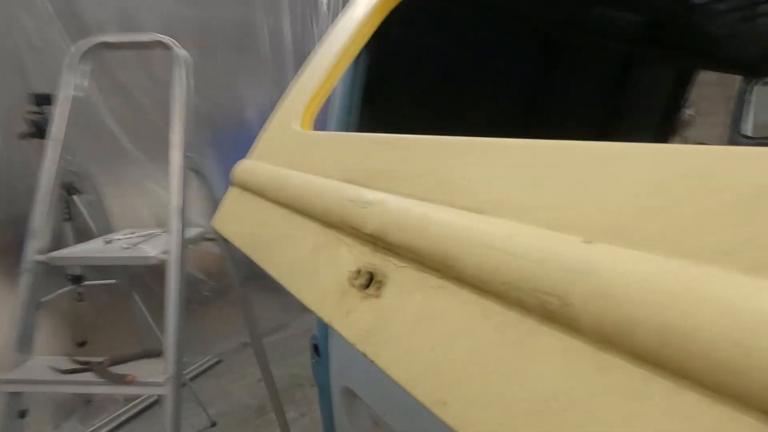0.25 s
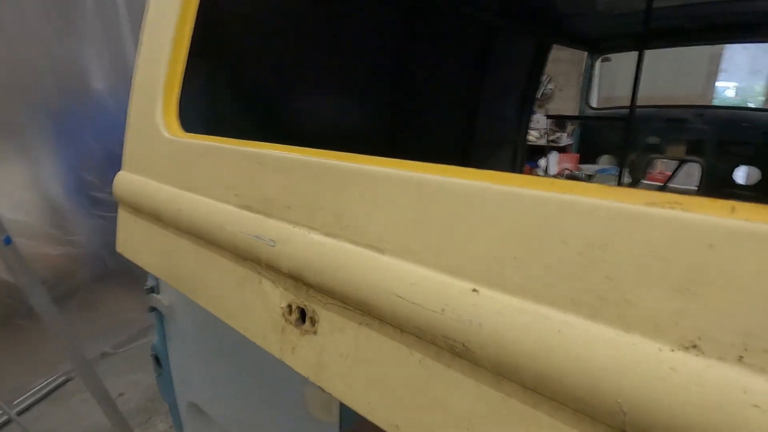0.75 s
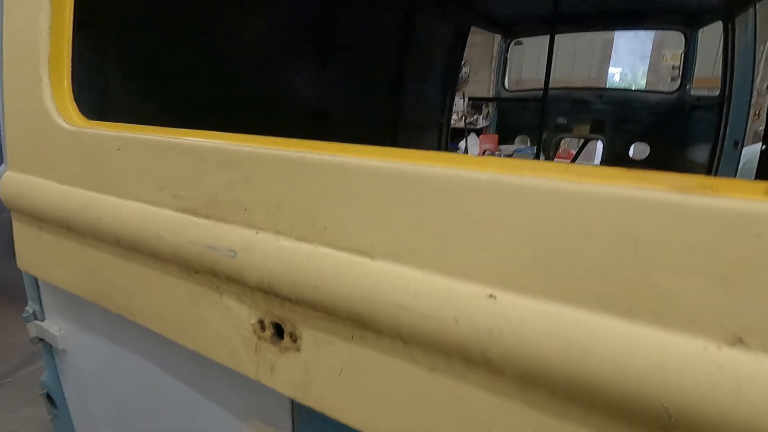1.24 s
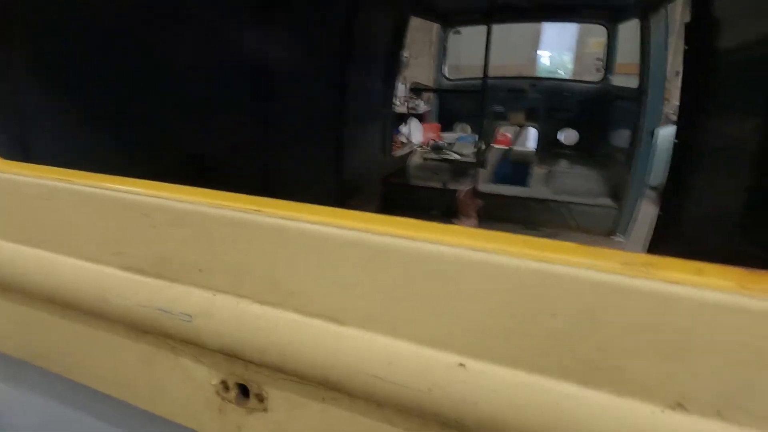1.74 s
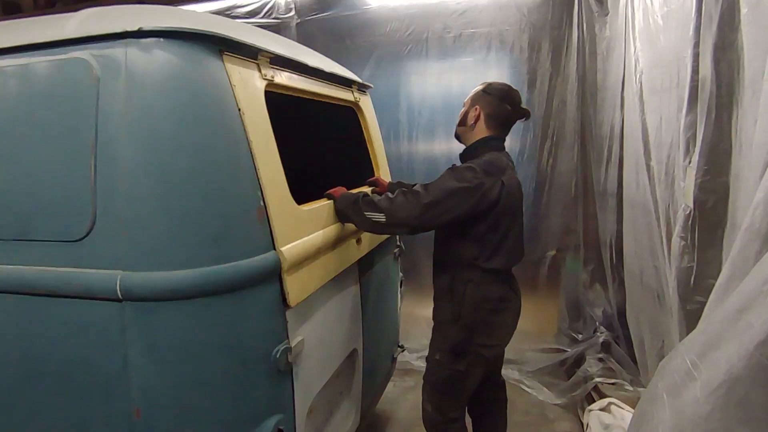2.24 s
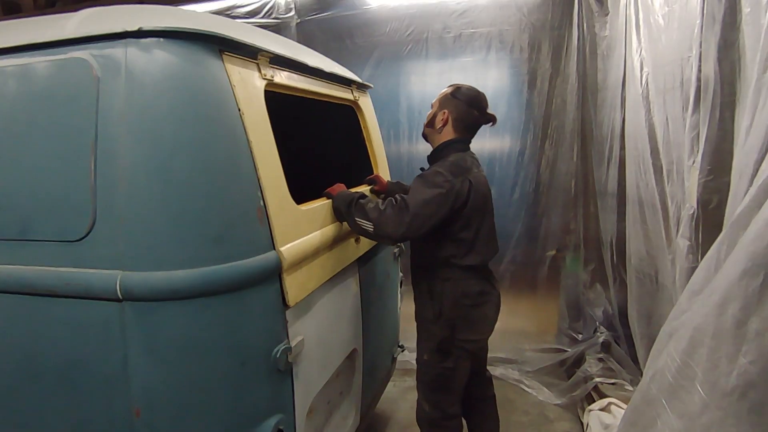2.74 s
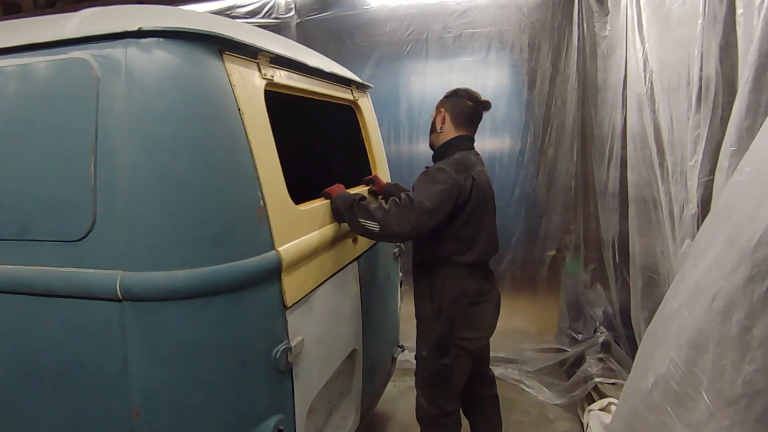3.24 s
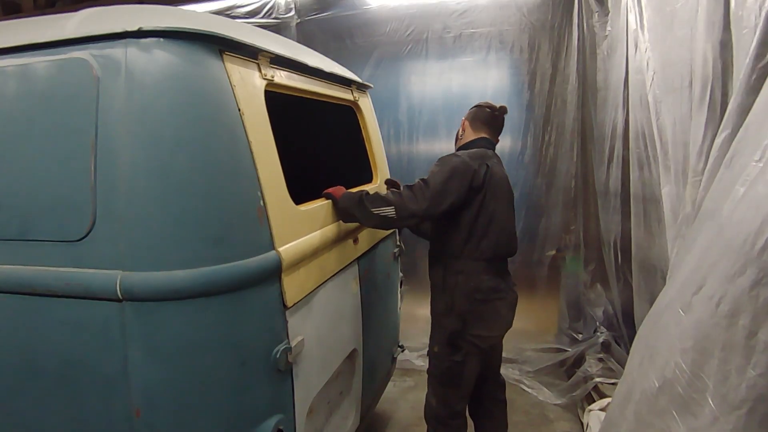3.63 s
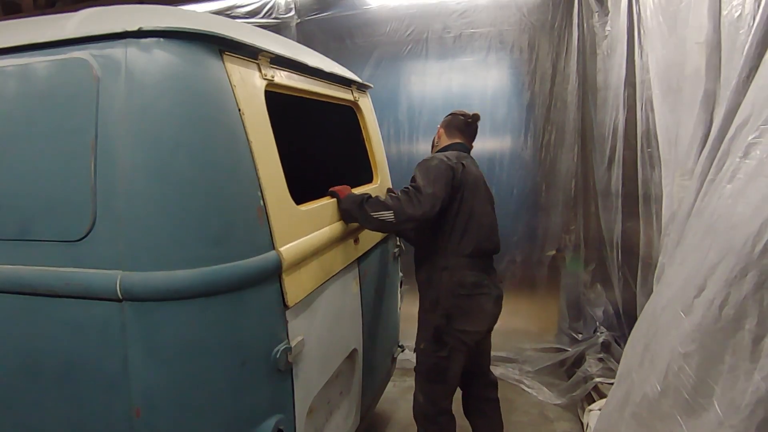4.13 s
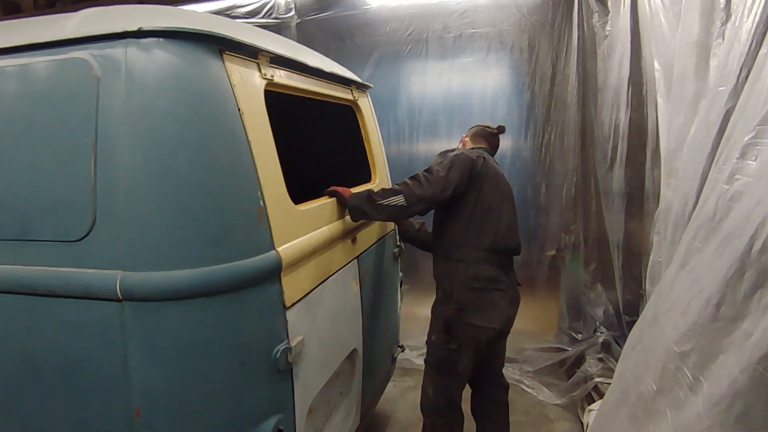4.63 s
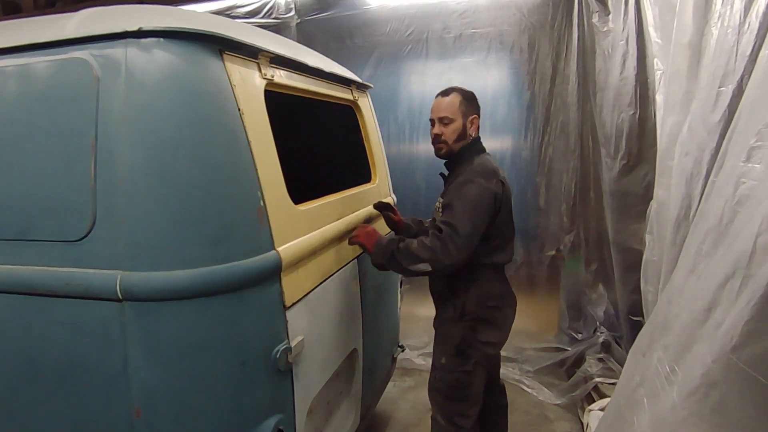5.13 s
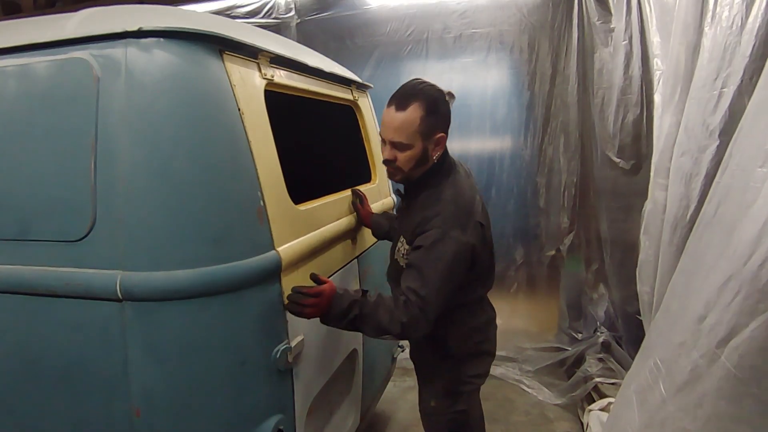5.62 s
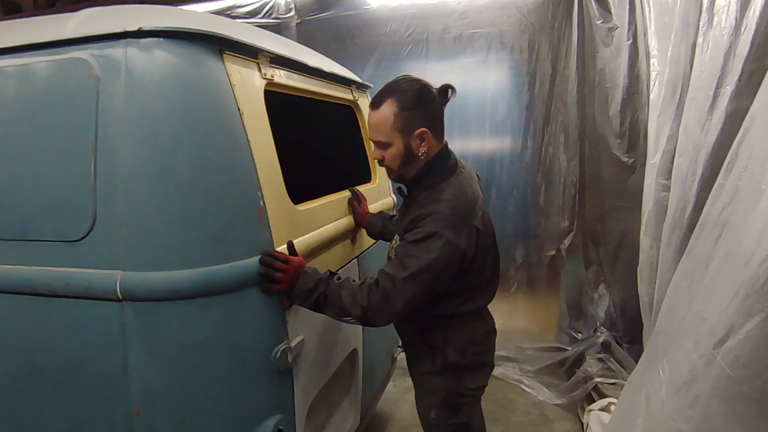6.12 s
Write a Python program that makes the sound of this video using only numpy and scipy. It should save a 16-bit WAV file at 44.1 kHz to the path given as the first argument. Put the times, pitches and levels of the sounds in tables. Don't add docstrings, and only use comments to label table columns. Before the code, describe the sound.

Creaks and clicks of a van tailgate swinging, one close slam with rattling rebounds, then three heavier, farther booming slams in a hushed garage.

```python
import sys
import numpy as np
from scipy import signal
from scipy.fft import rfft, irfft, next_fast_len
from scipy.io import wavfile
from scipy.ndimage import uniform_filter1d, map_coordinates

SR = 44100
rng = np.random.default_rng(int(sys.argv[2]) if len(sys.argv) > 2 else 0)


def generate_wav(signal):
    frames = np.transpose(np.atleast_2d(signal))
    scaled = np.clip(frames, -1, 1) * 32767
    pcm = np.round(scaled).astype(np.int16)
    wavfile.write(sys.argv[1], SR, pcm)


def rack_gain(trim_db):
    fader = np.asarray(trim_db, float)
    return 10 ** (fader / 20)


N = 280942
TIME = np.arange(N) / SR
CUT_S = 2.232

# (t/s, rise/s, clang level/dB, shudder/s, boom over clang/dB)
SLAMS = [
    (3.05, 0.033, -21, 0.44, -5),
    (4.257, 0.043, -14, 0.44, -7),
    (5.867, .011, -15.5, 0.43, -6.5),
]
# (f/Hz, width/Hz, level/dB)
PANEL = [(161, 10, 2.5), (200, 25, -6), (263, 37, -2), (447, 71, -5), (542, 20, -5), (701, 56, -6.5),
         (914, 33, -8.5), (1070, 17, -16.5), (1477, 39, -6.5)]
# (f/Hz, level/dB)
BLOW = [(40, -19), (150, -8.5), (500, -9), (1500, -10.5), (4000, -32), (9000, -41.5), (15000, -56.5)]
CRACK_RISE_S = 0.0015


def unit(x):
    return x / np.sqrt(np.mean(x ** 2) + 1e-20)


def along(points, hz):
    f, v = np.transpose(points)
    return np.interp(np.log(hz + 1), np.log(f + 1), v)


def coloured(x, response):
    size = 2 * next_fast_len(len(x) // 2 + 8192)
    gain = np.abs(response(np.fft.rfftfreq(size, 1 / SR)))
    cepstrum = irfft(np.log(gain + 1e-6), size)
    cepstrum[1:size // 2] *= 2
    cepstrum[size // 2 + 1:] = 0
    return irfft(rfft(x, size) * np.exp(rfft(cepstrum)), size)[:len(x)]


def peaks(modes, hz, sharp, base):
    power = sum(rack_gain(2 * db) / (1 + (2 * sharp * (hz - c) / w) ** 2) for c, w, db in modes)
    return np.sqrt(base ** 2 + power)


def edge(hz, at_hz):
    return 1 / (1 + (at_hz / (hz + 1)) ** 8)


def chatter(rate_hz, spread_db, share):
    chance = rng.random(N)
    size = np.minimum(rng.exponential(1, N), 3)
    bed = rng.standard_normal(N)
    hits = (chance < rate_hz / SR) * rack_gain(spread_db * size)
    return share * unit(hits) + (1 - share) * bed


def wobble(rate_hz):
    return map_coordinates(rng.standard_normal(400), [TIME * np.clip(rate_hz, 1, 60)])


def swell(s, length_s):
    return np.exp(-(2 * (TIME - s) / length_s - 1) ** 4)


def patchy(x, depth_db):
    z = signal.stft(x, nperseg=512)[2]
    field = uniform_filter1d(rng.standard_normal(z.shape), size=5, axis=0)
    field = uniform_filter1d(field, size=6, axis=1)
    return signal.istft(z * rack_gain(depth_db * unit(field)), nperseg=512)[1][:N]


def soft(db):
    return uniform_filter1d(rack_gain(db), size=150)


def ramp(s, length_s):
    return np.clip((TIME - s) / max(length_s, .001), 0, 1)


def fade(s, db_per_s):
    return -abs(db_per_s) * np.maximum(TIME - s, 0)


def slams():
    # (f/Hz, density/dB)
    clangs = [
        [(15, -44), (25, -10), (92, 6.5), (155, -1.5), (231, 1.5), (447, -11), (629, -9), (1060, -13),
         (1150, -12.5), (3000, -45.5), (3900, -61), (6600, -120)],
        [(15, -35), (25, -6), (102, -2.5), (209, -4), (271, 1), (318, -6), (604, -7.5), (816, -11), (1190, -13),
         (3000, -32), (3900, -61.5), (6600, -120)],
        [(15, -49.5), (25, -14), (96, -4.5), (240, -4), (318, -11), (389, -4.5), (569, -6), (816, -6),
         (1100, -8), (3000, -33), (3900, -35), (6600, -120)],
    ]
    # (f/Hz, density/dB)
    sizzles = [
        [(1180, -40.5), (2000, 2.5), (2430, -1), (3030, -10.5), (3740, -6), (4620, -17), (5580, -12),
         (7000, -27), (7630, -26), (9280, -33.5), (13000, -39)],
        [(1180, -25.5), (2000, -3.5), (2280, -6.5), (2820, -2), (3080, -7), (3630, -2), (4410, -13.5),
         (5670, -9.5), (6790, -24.5), (11400, -33), (13000, -41)],
        [(1180, -35.5), (2000, -5.5), (2940, -7.5), (3150, -14), (3740, -10), (4520, -23), (5200, -16.5),
         (6790, -33), (8450, -33), (10100, -40), (13000, -43.5)],
    ]
    # (f/Hz, width/Hz, level/dB)
    latch_rings = [
        (5600, 300, 0.5),
        (5730, 150, -1),
        (4930, 170, 3),
    ]
    # (f/Hz, width/Hz, level/dB)
    body_modes = [(45, 17, 2.5), (88.6, 7.5, 2.5), (103, 21, 2), (138, 42, -3), (183, 14, -0.5),
                  (236.1, 5.1, 2), (289.7, 8.6, 0)]
    # (f/Hz, width/Hz, level/dB)
    skin_modes = [(343, 6.2, 0.5), (380.2, 42, -3.5), (473, 38, -4.5), (486.6, 14, -2.5), (524, 5.9, -7.5),
                  (578, 14, 1), (659.5, 12, 1), (728, 38, -1.5), (867, 18, -5.5), (977, 7.7, -8.5),
                  (1110, 13, -1), (1216, 20, -3), (1328, 23, -2.5), (1420, 7.1, -0.5), (1540, 35, -1.5),
                  (1662, 70, -4), (1740, 62, -3), (2050, 20, -9)]
    latch_levels = [-16.5, -18, -16]
    close_times = [3.445, 4.698, 6.288]
    out = np.zeros(N)
    for row, clang, sizzle, ring, latch_db, close_s in zip(
            SLAMS, clangs, sizzles, latch_rings, latch_levels, close_times):
        boom_gain, skin_gain, latch_gain = shudder(*row, latch_db, close_s)

        def body_response(hz):
            return rack_gain(along(clang, hz)) * peaks(body_modes, hz, 1.0, 0.2) * np.sqrt(edge(hz, 41) - edge(hz, 270))

        def skin_response(hz):
            return rack_gain(along(clang, hz)) * peaks(skin_modes, hz, 0.89, 0.53) * np.sqrt(edge(hz, 300))

        def latch_response(hz):
            return rack_gain(along(sizzle, hz)) * peaks([ring], hz, 0.88, 1)

        shake = chatter(600, 2.3, 0.34)
        body = coloured(shake, body_response)
        skin = coloured(shake, skin_response)
        latch = patchy(coloured(chatter(2300, 2.0, 0.23), latch_response), depth_db=2.0)
        out += boom_gain * unit(body)
        out += skin_gain * rack_gain(0.73 * wobble(35)) * unit(skin)
        out += latch_gain * unit(latch)
    return out


def shudder(s, rise_s, clang_db, length_s, boom_db, latch_db, close_s):
    # (lead-in/dB, fade/(dB/s), sag over shudder/dB, drop as suppressor closes/dB, tail
    # fade/(dB/s))
    answers = [
        (-16, -7.5, 15, -2, 60),
        (-26, 26.5, 18.5, 6.5, 48.5),
        (-31, 38, 20, 11, 34.5),
    ]
    peak_s = s + rise_s
    share = ramp(peak_s, length_s)
    lead = (1 - ramp(s, rise_s)) ** 1.6
    closed = ramp(close_s, 0.014)
    gains = []
    for part_db, (lead_db, early, sag_db, drop_db, late) in zip((boom_db, 0, latch_db), answers):
        db = clang_db + part_db + lead_db * lead
        db = db - early * length_s * share - sag_db * share ** 2
        db = db - drop_db * closed + fade(peak_s + length_s, late)
        gains.append(soft(db - 200 * (TIME < s)))
    return gains


def blows():
    # (t/s, peak/dB)
    strikes = [
        (3.052, -10),
        (3.068, -3),
        (4.26, -15),
        (4.272, -6),
        (4.28, 7.5),
        (4.318, 1),
        (5.862, -18),
        (5.873, 3),
    ]
    # (t/s, f/Hz, level/dB)
    puffs = [
        (1.6595, 270, -19),
        (3.052, 298, -18.5),
        (4.318, 229.8, -11),
        (5.863, 200, -19),
        (5.8737, 444, -3),
    ]
    crack, push, t = np.zeros(N + SR), np.zeros(N + SR), TIME[:SR // 20]
    crack_rise = 1 - np.exp(-t / CRACK_RISE_S)
    push_rise = 1 - np.exp(-t / 0.002)
    for s, db in strikes:
        burst = crack_rise * rack_gain(db + 7 - 60 * t / 0.015) * rng.standard_normal(len(t))
        crack[round(s * SR):][:len(t)] += burst
    for s, hz, db in puffs:
        swing = rack_gain(db + 3.5 - 60 * t / 0.03) * push_rise * np.sin(2 * np.pi * hz * t)
        push[round(s * SR):][:len(t)] += swing
    return coloured(crack[:N], lambda hz: rack_gain(along(BLOW, hz))) + push[:N]


def knocks():
    # (t/s, f/Hz, peak/dB)
    hits = [(1.266, 390, -9.5), (1.279, 203, -6), (1.306, 232, -9.5), (1.32, 192, -11.5), (1.332, 231, -11),
            (1.36, 274, -9), (1.409, 188, -13), (1.422, 253, -13), (1.437, 252, -16.5), (1.453, 258, -13),
            (1.504, 171, -27), (1.515, 183, -22), (3.084, 328, -13), (3.105, 333, -13.5),
            (3.124, 258, -14.5), (3.135, 339, -14.5), (3.158, 199, -16), (3.18, 234, -8),
            (3.203, 150, -15.5), (3.268, 279, -18.5), (3.282, 193, -22), (3.37, 263, -22),
            (3.408, 236, -32), (3.443, 150, -39), (4.293, 336, -5), (4.317, 226, -6.5), (4.355, 409, -8.5),
            (4.386, 215, -9), (4.406, 263, -10.5), (4.449, 249, -12), (4.512, 150, -18),
            (4.522, 260, -14.5), (4.556, 167, -16), (4.571, 258, -24), (4.59, 301, -21),
            (4.603, 306, -21.5), (4.619, 161, -27), (4.634, 150, -21), (4.648, 150, -25),
            (5.883, 1028, -11.5), (5.924, 549, -9.5), (5.943, 211, -9.5), (5.964, 161, -5),
            (5.992, 215, -13.5), (6.044, 272, -12.5), (6.064, 236, -11), (6.11, 602, -22),
            (6.135, 150, -16), (6.153, 226, -18), (6.186, 150, -23), (6.198, 151, -13), (6.24, 150, -20),
            (6.257, 149, -22), (6.317, 223, -41)]
    cycles, level_db, crack_db = 6, 2.5, -16
    out, t = np.zeros(N + SR), TIME[:SR // 20]
    rise = 1 - np.exp(-t / CRACK_RISE_S)
    cracks = coloured(rng.standard_normal(N + SR), lambda hz: rack_gain(along(BLOW, hz)))
    for s, hz, db in hits:
        at = round(s * SR)
        swing = np.sin(2 * np.pi * hz * t) * rack_gain(-60 * t * hz / cycles)
        crack = unit(cracks[at:][:len(t)]) * rack_gain(crack_db - 60 * t / .012)
        out[at:][:len(t)] += rack_gain(db + level_db) * rise * (swing + crack)
    return out[:N]


def rings():
    # (t/s, length/s, f/Hz, level/dB)
    modes = [(0.3, 0.075, 1087, -53), (0.303, 0.11, 699, -50), (0.366, 0.12, 3617, -50),
             (0.374, 0.075, 2379, -47), (0.505, 0.049, 1571, -39), (1.249, 0.11, 2024, -35.5),
             (1.298, 0.089, 872, -28), (1.319, 0.168, 301, -29.5), (1.355, 0.087, 5307, -51.5),
             (1.364, 0.07, 6104, -53.5), (1.398, 0.075, 1528, -33), (1.405, 0.068, 1431, -39.5),
             (1.486, 0.07, 4048, -55), (1.509, 0.051, 872, -46), (1.759, 0.087, 2142, -69),
             (1.846, 0.13, 710, -51.5), (2.038, 0.116, 2734, -62), (2.254, 0.064, 602, -62),
             (2.717, 0.284, 602, -69.5), (2.757, 0.081, 1453, -82.5), (3.061, 0.064, 6395, -67),
             (3.077, 0.087, 1130, -32), (3.112, 0.075, 5738, -68), (3.117, 0.134, 4059, -64),
             (3.187, 0.064, 5394, -55), (3.303, 0.048, 1130, -51), (3.32, 0.081, 5598, -81),
             (3.338, 0.058, 3962, -80), (3.542, 0.064, 1754, -70), (3.855, 0.07, 1108, -74),
             (3.987, 0.0516, 613, -70), (4.273, 0.052, 6212, -58.5), (4.272, 0.064, 2756, -49),
             (4.277, 0.058, 5437, -47.5), (4.326, 0.168, 4618, -67.5), (4.398, 0.075, 5781, -57.5),
             (4.412, 0.058, 5544, -57), (4.418, 0.041, 6223, -67.5), (4.464, 0.059, 1162, -34),
             (4.485, 0.069, 3456, -57), (4.534, 0.058, 4651, -74), (5.87, 0.07, 2982, -46),
             (5.864, 0.07, 3692, -48), (5.871, 0.07, 4026, -53), (5.869, 0.064, 3197, -42),
             (5.869, 0.07, 5286, -48), (5.962, 0.064, 2971, -49), (5.973, 0.07, 1108, -29),
             (6.089, 0.069, 2939, -56), (6.089, 0.07, 3391, -62)]
    level_db, drift_rad = 3.5, 0.35
    out, drift = np.zeros(N), drift_rad * wobble(40)
    for s, length_s, hz, db in modes:
        span = slice(round(s * SR), round((s + length_s) * SR))
        t = TIME[span] - s
        tone = np.sin(2 * np.pi * hz * t + drift[span])
        out[span] += rack_gain(db + level_db) * np.sin(np.pi * t / length_s) * tone
    return out


def contacts():
    # (t/s, peak/dB, knock/dB, tick/dB, t60/s)
    touches = [(0.0294, -27.5, -8, -28, 0.28), (0.167, -38, 4, -29, 0.14), (0.2746, -39.5, -2, -31, 0.63),
               (0.3922, -15.5, -29, -21, 0.18), (0.4268, -36, 3, -31, 0.55), (0.4767, -46, 19, -25, 0.08),
               (0.501, -14.5, -7.5, -30, 0.27), (0.7164, -32, 4.5, -22, 0.092),
               (0.82, -33.5, 7.5, -28, 0.05), (0.9745, -29, -12, -33, 0.3), (1.0936, -34, 6, -25.5, 0.65),
               (1.1912, -31.5, 8.5, -27.5, 0.91), (1.2589, -17.5, -14.5, -30, 0.11),
               (1.263, -9.5, 3, -29, 0.26), (1.3073, -8.5, -3.5, -37, 0.38), (1.3431, -17, 3, -39, 0.14),
               (1.4022, -13.5, -7, -32.5, 0.36), (1.4402, -26.5, 7.5, -41, 0.084),
               (1.506, -23, -6, -37, 0.23), (1.528, -36, 5, -30, 0.05), (1.646, -33, 8.5, -30, 0.19),
               (2.1861, -31, -9, -26, 0.63), (2.218, -23, -4.5, -36, 0.087)]
    # (f/Hz, level/dB, t60/s)
    steel_modes = [(1690, -8, 0.41), (1995, -2, 0.23), (2480, -5, 0.37), (3120, -15.5, 0.41),
                   (3510, -8.5, .25), (3890, -9, .3), (4160, -19.5, 0.27)]
    # (f/Hz, density/dB)
    snap_colour = [(530, -32), (900, -13.5), (1440, -14.5), (2000, -10), (2700, -10), (2970, -11.5),
                   (5000, -14), (6550, -21.5), (9000, -39), (11700, -74), (19800, -120)]
    (snap, knock, tick, ring), t = np.zeros((4, N)), TIME[:SR // 2]
    rise = 1 - np.exp(-t / .001)
    for s, db, knock_db, tick_db, t60_s in touches:
        span = slice(round(s * SR), round(s * SR) + len(t))
        decay = rack_gain(-60 * t / max(t60_s, .02)) * rise
        tones = 0
        for hz, mode_db, mode_t60_s in steel_modes:
            strength = rack_gain(mode_db + rng.normal(0, 3.3) - 60 * t / mode_t60_s)
            tones = tones + strength * np.sin(2 * np.pi * hz * t)
        burst = (decay + 1.9 * rack_gain(-60 * t / 0.047)) * rng.standard_normal(len(t))
        ring[span] += rack_gain(db - 17.0) * tones * decay
        snap[span] += rack_gain(db - 17.5) * burst
        tick[span] += rack_gain(db + tick_db - 10.5) * burst
        knock[span] += rack_gain(db + knock_db - 5.5) * decay ** 0.64 * rng.standard_normal(len(t))

    def bright(hz):
        return rack_gain(along(snap_colour, hz))

    def airy(hz):
        modes = [(8500, 900, -2), (11400, 1200, 0.2)]
        return edge(hz, 8400) * (1 - edge(hz, 19000)) * peaks(modes, hz, 1, 0.091)

    def hollow(hz):
        return peaks(PANEL, hz, 1.0, 0.2) * edge(hz, 71) * (1 - edge(hz, 1600))

    out = ring
    for x, colour in ((snap, bright), (tick, airy), (knock, hollow)):
        mean_power = np.mean(colour(np.linspace(0, SR / 2, 4000)) ** 2)
        out = out + coloured(x, colour) / np.sqrt(mean_power)
    return out


def handling():
    # (f/Hz, density/dB)
    rumble_colour = [(59, -32.5), (100, -11), (157, 6), (479, 0), (571, 2), (1070, -10.5), (1200, -19.5),
                     (2000, -17), (2600, -45), (4400, -120)]
    # (f/Hz, density/dB)
    moving_colour = [(530, -42.5), (900, -6.5), (1060, -1), (1200, -6), (1540, -6.5), (3450, -8),
                     (6870, -25), (9050, -37.5), (11700, -29.5), (12900, -41.5), (14000, -65.5)]
    # (f/Hz, density/dB)
    shut_colour = [(530, -40), (900, 3.5), (1600, -5), (2620, 1.5), (2740, 2), (2940, 1), (3220, 5.5),
                   (5280, -14), (7030, -19), (9370, -35), (11500, -22.5), (14000, -53)]
    rumble_gain, rustle_gain, sway_gain = movement()
    low = coloured(chatter(500, 4.0, 0.38),
                   lambda hz: rack_gain(along(rumble_colour, hz)) * peaks(PANEL, hz, 1.0, 0.94))
    grain = chatter(1300, 2.0, 0.51)
    moving = unit(coloured(grain, lambda hz: rack_gain(along(moving_colour, hz))))
    shut = unit(coloured(grain, lambda hz: rack_gain(along(shut_colour, hz))))
    angle = np.pi / 2 * np.clip((TIME - 1.7) / 0.043, 0, 1)
    high = patchy(np.cos(angle) * moving + np.sin(angle) * shut, depth_db=2.5)
    sub = coloured(rng.standard_normal(N), lambda hz: edge(hz, 39) * (1 - edge(hz, 130)))
    rumble = rumble_gain * rack_gain(1.0 * wobble(27)) * unit(low)
    rustle = rustle_gain * rack_gain(0.33 + 0.53 * wobble(26)) * high
    return rumble + rustle + sway_gain * unit(sub)


def movement():
    # (t/s, level/dB)
    swing_points = [(0.0, -40), (0.38, -41.5), (0.53, -38), (1.11, -41), (1.37, -31), (1.56, -41.5),
                    (1.7, -48.5), (2.09, -49), (2.23, -44.5)]
    # (t/s, length/s, level/dB)
    brushes = [
        (.15, .045, -40),
        (1.17, .1, -43),
        (1.34, .12, -33),
        (2.196, .06, -43.5),
    ]
    rumble_db, rustle_db, rustle_growth = -2.5, -6.5, 0.89
    shut_s, shut_db, shut_hold_s, shut_fade_db_per_s = 1.262, -27.5, 0.067, 38.5
    sway_s, sway_rise_s, sway_db, still_db, sway_fade_db_per_s = 0.29, 0.14, -52, -72, 3
    jolt_db, jolt_fade_db_per_s = -30, 32.5

    swing_db = np.interp(TIME, *np.transpose(swing_points))
    start_db = swing_points[0][1]
    struck = TIME > shut_s
    drone = struck * rack_gain(shut_db + fade(shut_s + shut_hold_s, shut_fade_db_per_s))
    wipes = sum(rack_gain(db) * swell(s, length_s) for s, length_s, db in brushes)
    follow_db = still_db + (sway_db - still_db) * ramp(sway_s, sway_rise_s)
    follow_db = follow_db + fade(sway_s + 3 * sway_rise_s, sway_fade_db_per_s)
    jolt = struck * rack_gain(jolt_db + fade(shut_s, jolt_fade_db_per_s))
    rumble = np.hypot(rack_gain(swing_db + rumble_db), drone)
    rustle = np.hypot(rack_gain(rustle_db + start_db + rustle_growth * (swing_db - start_db)), wipes)
    return rumble, rustle, np.hypot(rack_gain(follow_db), jolt)


def seal():
    # (t/s, length/s, pitch/Hz, level/dB)
    squeaks = [
        (1.645, 0.0062, 460, -35),
        (1.677, 0.022, 441, -28),
        (1.719, 0.011, 450, -32),
    ]
    # (multiple, level/dB)
    harmonics = [(1, -3), (2, 2), (3, -6.5)]
    grit_share = 0.36
    out = np.zeros(N)
    grit = unit(coloured(rng.standard_normal(N), lambda hz: 1 - edge(hz, 350)))
    for s, length_s, hz, db in squeaks:
        phase = 2 * np.pi * hz * (TIME + 0.00063 * wobble(50))
        slips = sum(rack_gain(level + 2.2 * wobble(58)) * np.sin(round(k) * phase) for k, level in harmonics)
        out += rack_gain(db) * swell(s, length_s) * slips * (1 - grit_share + grit_share * grit)
    return out


def noise_bands():
    # (t/s, length/s, f/Hz, width/Hz, level/dB)
    bands = [(0.042, 0.046, 174, 40, -42), (0.386, 0.22, 274, 90, -32), (.392, .01, 5700, 500, -42),
             (0.475, 0.0064, 260, 120, -27), (0.813, 0.2, 556, 40, -45), (1.09, 0.084, 660, 75, -37),
             (1.3, 0.16, 2500, 60, -44), (1.262, 0.03, 240, 100, -23), (1.267, 0.098, 2080, 670, -27),
             (1.268, .03, 2300, 500, -28), (1.329, 0.16, 245, 120, -26), (1.4, .005, 11500, 2100, -50),
             (1.533, .02, 11000, 2500, -62), (1.85, 0.31, 700, 67, -55), (2.01, 0.13, 6800, 560, -66),
             (2.19, 0.032, 640, 81, -41), (2.212, .018, 1700, 400, -38), (2.24, 0.25, 650, 70, -64),
             (2.584, 0.019, 290, 300, -57), (2.59, 0.24, 410, 360, -61), (3.15, .25, 560, 90, -37),
             (3.184, 0.18, 5420, 50, -61), (3.5, 0.16, 637, 65, -56.5), (3.547, 0.051, 1770, 30, -67),
             (3.68, 0.29, 670, 54, -66), (4.53, 0.16, 555, 210, -37.5), (4.7, .2, 420, 150, -48),
             (5.609, 0.042, 898, 120, -64), (5.852, .014, 690, 370, -49), (6.28, .09, 380, 150, -44)]
    size = next_fast_len(N)
    noise, f = rfft(rng.standard_normal(size)), np.fft.rfftfreq(size, 1 / SR)
    out = np.zeros(N)
    for s, length_s, hz, width_hz, db in bands:
        resonance = peaks([(hz, width_hz, 0)], f, 0.81, 0)
        sung = unit(irfft(noise * resonance ** 2, size)[:N])
        out += rack_gain(db) * swell(s, length_s) * sung
    return out


def garage():
    # (f/Hz, density/dB)
    low_colour = [(15, -40), (25, 0), (43, -5), (70, 3.5), (102, 3.5), (306, -7), (400, -23), (520, -40.5),
                  (880, -120)]
    # (f/Hz, density/dB)
    hollow_colour = [(220, -35.5), (380, -2.5), (423, -11.5), (533, 0.5), (646, 0.5), (799, -7), (900, -19),
                     (1170, -40), (1980, -120)]
    # (f/Hz, density/dB)
    shuffle_colour = [(440, -31), (750, 1.5), (827, -2), (1090, -2.5), (1430, -6.5), (1600, -16),
                      (2400, -16), (3120, -47.5), (5280, -120)]
    # (f/Hz, density/dB)
    hiss_colour = [(880, -34.5), (1500, -5), (2140, -7), (3130, -5.5), (5700, -8.5), (14200, -8.5),
                   (15600, -6.5)]
    hiss_gain, room_gains = suppressor()
    hiss = coloured(rng.standard_normal(N), lambda hz: rack_gain(along(hiss_colour, hz)))
    out = hiss_gain * rack_gain(6.5) * unit(hiss)
    for gain, colour in zip(room_gains, (low_colour, hollow_colour, shuffle_colour)):
        layer = coloured(rng.standard_normal(N), lambda hz: rack_gain(along(colour, hz)))
        out += gain * rack_gain(1.3 * wobble(42)) * unit(layer)
    return out


def suppressor():
    # (t/s, low/dB, hollow/dB, shuffle/dB, sink/(dB/s))
    openings = [
        (2.24, -61, -60.5, -68.5, 35),
        (2.586, -57.5, -63, -67, 2),
        (3.4, -49.5, -61.5, -73, -44),
        (3.571, -57, -54.5, -66, 36),
        (3.87, -59.5, -64, -73, 22),
        (5.224, -64, -67.5, -74, 37.5),
        (5.46, -71, -78, -84, 0),
        (5.61, -64, -70.5, -66, 40.5),
        (5.72, -71.5, -71, -76, 7),
    ]
    first_db, low_db, high_db = -76.5, -79.5, -70.5
    wait_s, rise_s, hold_s, sink_db_per_s = .07, .14, 0.27, 13.5
    hiss_levels = [np.where(TIME < SLAMS[0][0] + .2, first_db, low_db)]
    for slam_s, *_ in SLAMS:
        start_s = slam_s + wait_s
        lift = high_db - 20 * (1 - ramp(start_s, rise_s))
        hiss_levels.append(lift + fade(start_s + rise_s + hold_s, sink_db_per_s))
    rows = np.array(openings)
    latest = np.maximum(np.searchsorted(rows[:, 0], TIME) - 1, 0)
    s, *levels, sink = rows[latest].T
    room_gains = [soft(db - sink * np.maximum(TIME - s, 0)) for db in levels]
    return rack_gain(np.max(hiss_levels, axis=0)), room_gains


def scene():
    def treble(hz):
        notch = 1 - 1.1 / (1 + ((hz - 9050) / 120) ** 2)
        return notch * rack_gain(-.03 * np.maximum(hz - 12900, 0))

    steel = noise_bands() + knocks() + rings()
    near = coloured(handling() + contacts() + seal() + steel, treble)
    near = near * np.clip((CUT_S - TIME) / 0.00111, 0, 1)
    far = (steel + garage()) * (TIME >= CUT_S)
    return (near + slams() + blows() + far)[None]


def low_pass(x):
    return signal.sosfilt(signal.butter(12, 15800, fs=SR, output="sos"), x)


def record(dry):
    # (t/s, length/s, from f/Hz, depth/dB, lines spared up to f/Hz)
    dropouts = [(1.255, .009, 7000, -20.5, 100), (2.578, 0.017, 3020, -2, 100),
                (3.147, 0.013, 6610, -30.5, 3800), (3.357, .016, 6000, -18, 4000),
                (4.294, 0.013, 6620, -27, 3800), (4.447, 0.015, 6570, -24, 4000),
                (4.936, .016, 2480, -10, 15000), (5.408, .012, 1995, -12, 15000),
                (5.461, .026, 1900, -30, 15500), (5.707, .012, 2200, -12, 15500),
                (5.895, 0.014, 6000, -52, 4000), (6.137, 0.024, 5600, -15, 4000)]
    spared_db = 4.5
    hz, t, z = signal.stft(dry[0], SR, nperseg=256)
    for s, length_s, from_hz, db, _ in dropouts:
        weak = edge(hz, from_hz) ** 2 + 0.95 * np.exp(-((hz - 4500) / 520) ** 4)
        z = z * rack_gain(db * weak[:, None] * np.exp(-(2 * (t - s) / length_s) ** 4))
    x = signal.istft(z, SR, nperseg=256)[1][:N]

    hz, t, lost = signal.stft(dry[0] - x, SR, nperseg=1024)
    starts, *_, tops = np.transpose(dropouts)
    power = np.abs(lost) ** 2
    strong = power > rack_gain(2 * spared_db) * uniform_filter1d(power, size=60, axis=0)
    nearest = np.abs(t[:, None] - starts).argmin(axis=1)
    spared = strong & (hz[:, None] < tops[nearest])
    x = (x + signal.istft(lost * spared, SR, nperseg=1024)[1][:N])[None]

    x = x / (1 + np.abs(x / .8) ** 14) ** (1 / 14)
    x = irfft(rfft(x) * (np.fft.rfftfreq(N, 1 / SR) < 15780), N)
    return low_pass(x)


dry = scene()
out = record(dry)
generate_wav(out)
```